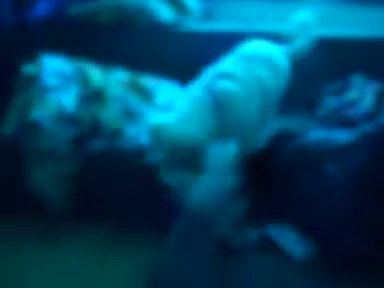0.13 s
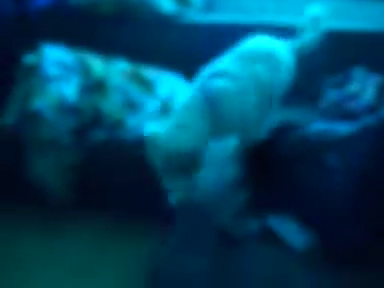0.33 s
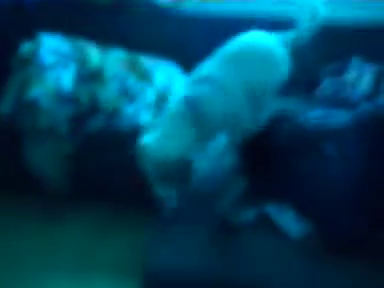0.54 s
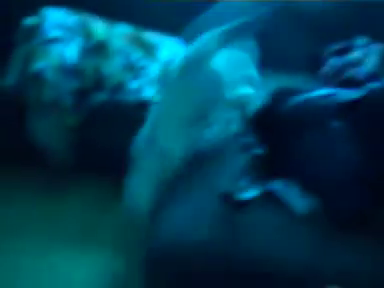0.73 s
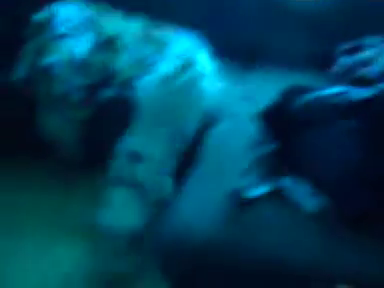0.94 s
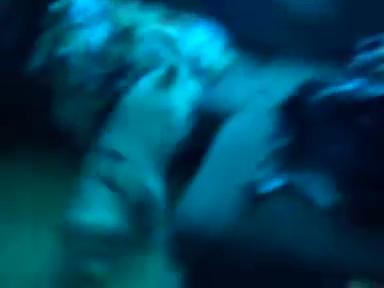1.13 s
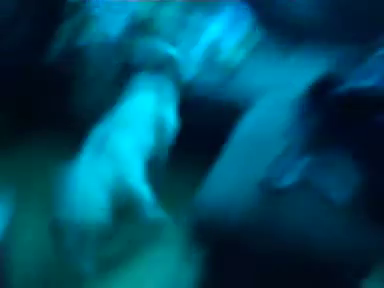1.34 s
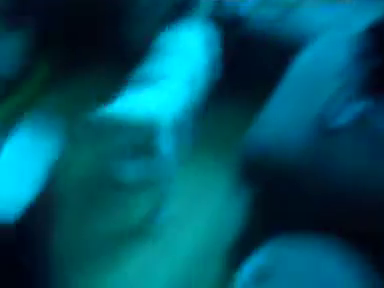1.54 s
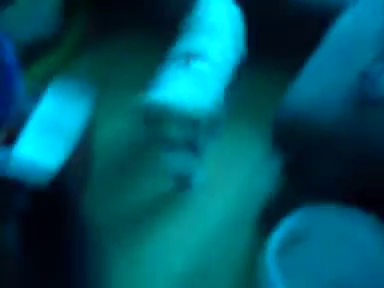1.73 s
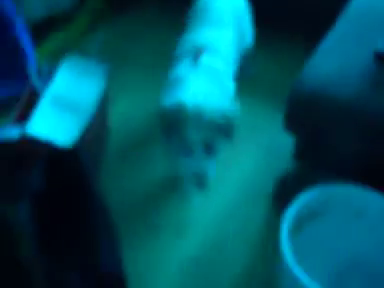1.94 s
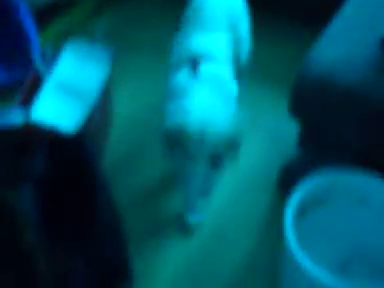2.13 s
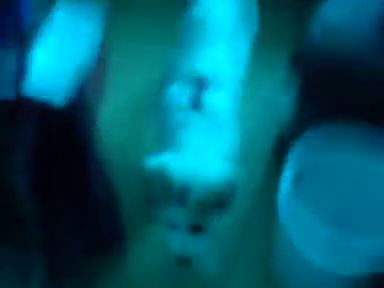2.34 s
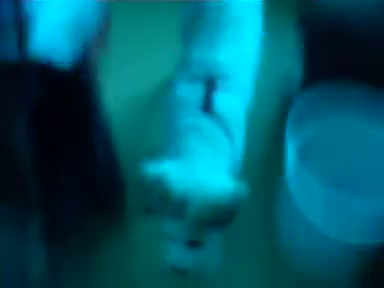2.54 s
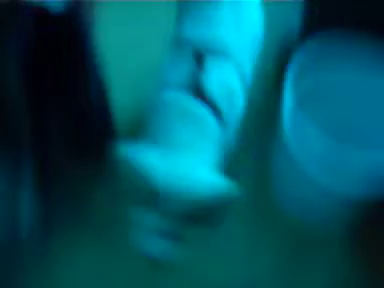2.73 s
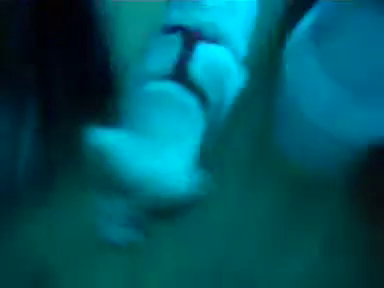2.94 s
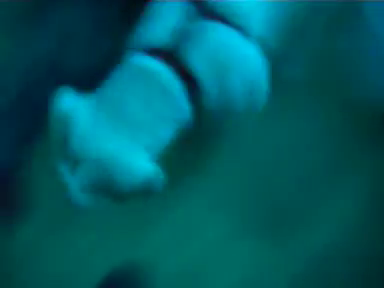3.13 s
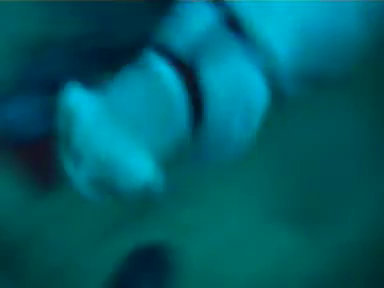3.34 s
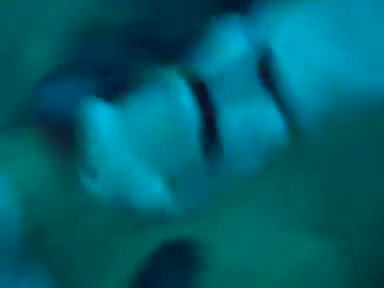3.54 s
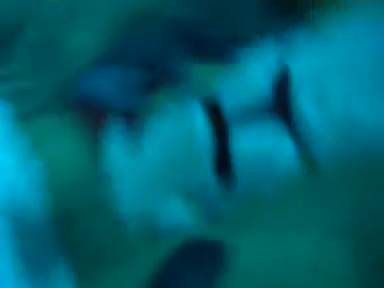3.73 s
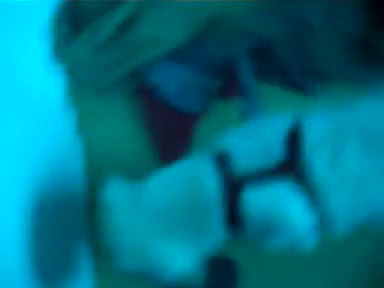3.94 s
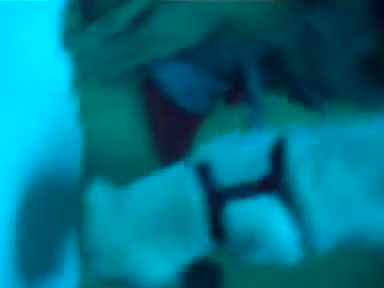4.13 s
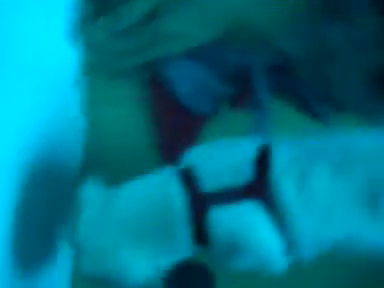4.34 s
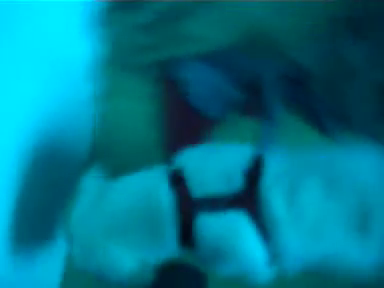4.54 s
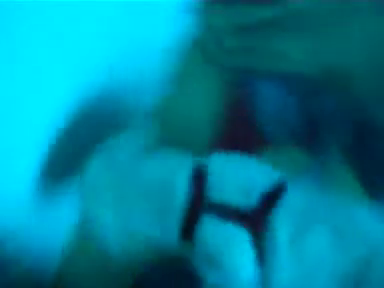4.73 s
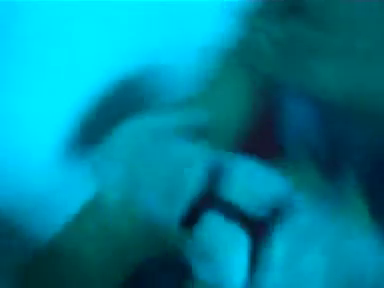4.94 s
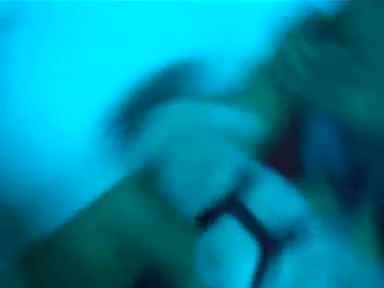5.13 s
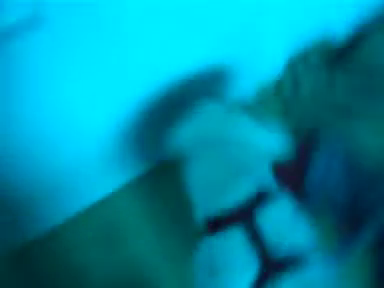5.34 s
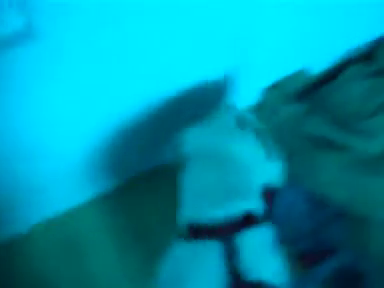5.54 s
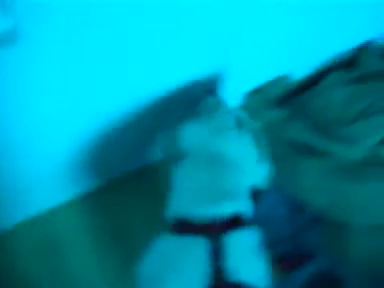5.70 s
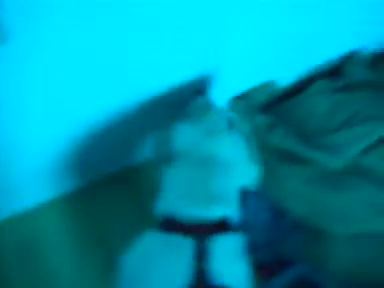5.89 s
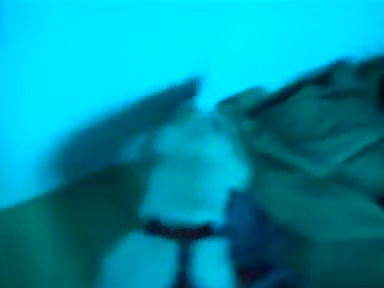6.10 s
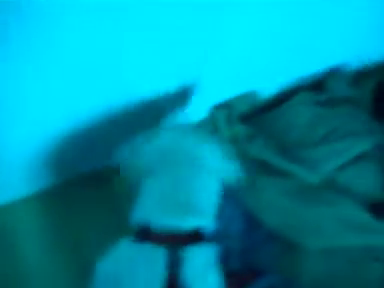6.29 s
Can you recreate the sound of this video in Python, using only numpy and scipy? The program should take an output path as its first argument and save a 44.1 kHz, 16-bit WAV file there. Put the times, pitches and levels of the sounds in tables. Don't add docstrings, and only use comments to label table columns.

```python
import sys
import numpy as np
from scipy import signal
from scipy.fft import rfft, irfft, next_fast_len
from scipy.io import wavfile

SR = 44100
rng = np.random.default_rng(int(sys.argv[2]) if len(sys.argv) > 2 else 0)


def volts_from_db(level):
    exponent = np.asarray(level, float) / 20
    return 10 ** exponent


def persist_wave(psi):
    counts = np.round(np.clip(psi, -1, 1) * 32767).astype(np.int16)
    wavfile.write(sys.argv[1], SR, np.atleast_2d(counts).T)


N = 280476

# time in seconds, effort in dB, nearness to the microphone 0-1.
RUB = [(0, -64.5, 0.37), (.6, -60, 0.3), (0.831, -56.5, 0.74), (.97, -44.5, 0), (1.13, -57, 0),
       (1.24, -49, 0), (1.47, -55.5, 0), (2.02, -69, 0.46), (2.27, -59, 0.1), (2.8, -58.5, 0.57),
       (3.12, -57, 0.84), (3.5, -60.5, 0.9), (3.93, -48, 1), (4.289, -52, 0.68), (4.5, -66.5, 0.8),
       (5.01, -51.5, 0.73), (5.12, -61.5, 0.58), (6.36, -74.5, 0.7)]
# dB at mean effort, share of the effort's swing.
RUB_ZONES = [(-61.5, 0.5), (-58.5, 0.46), (-58.5, 1.0), (-76, 0.27)]
MEAN_EFFORT_DB = -58
NEAR_TOP_DB = 17
ZONES_HZ = [60, 900, 3000, 8000, 17000]
# frequency in Hz, level in dB per Hz.
CLOTH = [(35, -55), (60, -24.5), (148, -18), (207, -14), (445, -1.5), (913, -11), (2350, -11.5), (3520, -9),
         (4320, -9.5), (4940, -4.5), (6330, -1.5), (9070, -9), (11900, -12), (13000, -33.5)]

# frequency in Hz, level in dB per Hz.
ROOM = [(18, -56), (30, -11), (202, -9.5), (443, -17), (632, -3), (1050, -1.5), (1220, 2.5), (1580, -25),
        (4040, -36.5), (4470, -37), (4830, -7), (5210, 0.5), (7070, -42.5), (10300, -32), (13000, -33.5)]
# frequency in Hz, level in dB per Hz.
ROOM_SIDE = [(18, -61), (30, -13.5), (344, -3), (491, 2), (3940, -8), (6070, -15), (9110, -7), (11700, -27),
             (13000, -9.5)]
ROOM_DB, ROOM_SIDE_DB = -64, -62.5
# pitch in Hz, width in Hz, level in dB.
HUM = [(610, 59, -76.5), (1145, 94, -71), (4550, 150, -71)]
# multiple of its pitch, rms level in dB.
WHINE = [(1, -72.5), (3, -83.5), (4, -72), (5, -77.5), (8, -81)]
WHINE_HZ = 1263.7

# start in seconds, length in seconds, pitch in Hz, width in Hz, level in dB.
BREATHS = [
    (0.2, 0.075, 5500, 550, -61),
    (0.33, 0.14, 5200, 400, -58),
    (1.27, 0.17, 5170, 450, -55),
    (1.8, 0.115, 5140, 500, -57),
    (2.39, 0.17, 5170, 500, -58),
    (3.98, 0.24, 5130, 760, -53),
    (1.25, 0.5, 2460, 1200, -60),
]

# start in seconds, length in seconds, peak in dB, weight in dB added to the low zones.
PAW_SLIDES = [
    (.285, 0.086, -51, -1.5),
    (.34, 0.075, -51, 5),
    (.605, 0.058, -56, 6),
    (.685, 0.066, -47, -1.5),
    (.98, 0.063, -43.5, -4.5),
    (3.795, 0.047, -48.5, 5),
    (3.88, 0.1, -50.5, -3),
    (4.26, 0.038, -45, -2.5),
]
SCUFFS = [
    (.42, 0.24, -58.5, 0),
    (.6, 0.038, -47.5, 0),
    (.71, 0.12, -50, 0),
    (.77, 0.1, -54, 0),
    (3.205, 0.033, -60, 0),
    (4.54, 0.094, -55, 0),
]
DRAGS = [
    (.8995, .004, -42, -2),
    (1.241, 0.0054, -31, -10),
    (1.2535, 0.0059, -22, -14),
    (2.212, .012, -49.5, 6),
    (2.663, 0.01, -48, 2),
    (5.243, .006, -46, 0),
]
RUSTLES = [(3.075, 0.072, -45.5, 0.11), (3.15, 0.053, -45, 0), (3.205, 0.039, -46.5, 0),
           (3.32, 0.02, -45, 0), (3.37, 0.025, -58, 0), (3.4, 0.036, -53.5, 0), (3.45, 0.034, -52, 1),
           (3.51, 0.059, -51.5, 0), (3.635, 0.045, -52, 0.024), (3.685, 0.018, -50, 0),
           (3.89, 0.059, -50.5, 0), (3.715, 0.022, -62, 0), (3.755, 0.021, -55, 0)]
SNUFFLES = [
    (4.538, 0.038, -48.5, 13),
    (4.545, 0.062, -38.5, -0.5),
    (4.6, 0.038, -53, 6),
    (4.79, 0.091, -45, -1),
]
SNORTS = [
    (5.222, 0.028, -53, -4.5),
    (5.245, 0.044, -47.5, 1),
    (5.27, .082, -44.5, 2),
    (5.34, .035, -57.5, -1),
]
# share before the peak, start dB, end dB
PAW_COLOUR, PAW_SHAPE = (-14.5, -0.5, -0.5, -15), (0.36, -2.2, -8.5)
SCUFF_COLOUR, SCUFF_SHAPE = (0, 0.5, -21, -29), (0.66, -11.5, -7)
DRAG_COLOUR, DRAG_SHAPE = (-25.5, -8.5, -0.5, -8), (0.98, -7.5, 0)
RUSTLE_COLOUR, RUSTLE_SHAPE = (-13, -9, -3.5, 2.5), (0.56, -2.5, -5.5)
SNUFFLE_COLOUR, SNUFFLE_SHAPE = (-2.5, -10, 0.5, -13), (0.41, -9, -15.5)
SNORT_COLOUR, SNORT_SHAPE = (-6, -4, 1.5, -7), (0.63, -2.6, -11)
STROKE_EDGE_S = 0.0028
# pitch in Hz, level in dB.
WEBBING = [(4100, -2.5), (5500, -2.5), (7000, 5), (8800, -20), (12000, -5)]
THREAD_WIDTH_HZ, THREADS_PER_S, THREADS_DB = 310, 920, 3
# pitch in Hz, width in Hz, level in dB.
SNOUT = [(578, 57, 13), (704, 78, 3.5), (1040, 690, 1.5), (1650, 570, -0.5), (3500, 670, -3.5),
         (4820, 510, -2.5), (5970, 1900, -38)]
NOSE_LOW_HZ, NOSE_GAP_HZ, NOSE_GAP_WIDTH_HZ, NOSE_GAP_SHARE = 550, 2400, 900, .7

# start in seconds, peak in dB.
BOOMS = [
    (0.454, -64),
    (0.781, -51),
    (0.898, -50),
    (0.999, -57.5),
    (1.129, -52.5),
    (1.248, -58.5),
    (1.558, -58),
    (3.901, -58.5),
]
BOOM_HZ, BOOM_T60_S = 147, 0.24

# start in seconds, peak in dB, middle and top in dB
# relative to that, ring in Hz.
TICKS = [(0.5269, -33, 5, -7, 2090), (0.8876, -38, -21, 8, 6540), (0.9038, -11, -21, 12, 6500),
         (0.909, -19, -11, -32, 6550), (0.928, -11.5, -27, -32, 6300), (1.1306, -20, -5, -14, 5240),
         (1.254, -14, -16, -3, 6170), (1.2599, -5, -31, -6, 6150), (1.643, -22.5, -12, -46, 5040),
         (1.7947, -26.5, -15.5, -10, 7150), (2.0175, -21.5, -13, -10.5, 5700),
         (2.2222, -17.5, -13, -14.5, 7400), (2.408, -35, 0.5, -29, 5900), (2.608, -33, -4, -26, 4450),
         (2.6698, -24.5, -12.5, -30, 4530), (2.958, -30, -8.5, -30, 5900), (3.25, -30, -9, 6.5, 6100),
         (1.226, -36, -12.5, -8.5, 6500), (3.931, -23, -9, 1.5, 4270), (5.2479, -25, -2, -4, 4940)]
SNAPS = [(.9048, -6, -28, 8, 10100), (0.9063, -13, -25, -10, 5900), (0.9095, -19, -29, 3, 6550),
         (0.9123, -13, -28, -20, 5490), (0.916, -17, -19, -20, 6040), (1.129, -18, -4.5, -1, 8800),
         (1.2446, -1, -27.5, -4, 6600), (1.2569, 3, -29, -8, 8800), (.846, -33, -25, -10, 6500),
         (.7045, -30, -22, -20, 5900), (.63, -36, -10, -5, 7800), (1.2675, -12, -25, -15, 6200),
         (1.2762, -12.5, -19, -20, 4380), (3.932, -20, -3.5, 4, 4280), (3.957, -19.5, -11, -20, 3240),
         (4.075, -37, -8, -2, 6800), (4.0743, -21.5, -4, -20, 1050), (4.0775, -30, -17, -20, 3940),
         (3.9005, -39, 1, -15, 1000), (5.041, -31, -19, -20, 4330), (0.585, -33.5, 11, -30, 4000),
         (1.3646, -25.5, -20, -6, 8640), (1.475, -44, 13, -28, 6530), (1.7784, -27, -17, -15, 7040),
         (1.8502, -40.5, 2.5, 11.5, 5270), (2.0027, -30, -1.5, -25, 5400), (2.6268, -30, -22, -30, 6500),
         (2.879, -48, -10, 12, 11600), (2.92, -45, -12, 12, 11400), (3.784, -13, -13, 8.5, 5740),
         (4.0728, -15, -12, 3.5, 4370), (4.1616, -29, 0.5, 11, 5340), (5.0308, -35, -7, 12, 6760),
         (5.109, -36, -20, -32, 5200), (5.1088, -35, -21, -30, 3580), (5.8172, -34.5, -26, -22, 5850),
         (5.879, -38.5, -24, -16, 5030), (6.0683, -33, -7, -26, 4550), (6.192, -42.5, 3, -22, 5200),
         (6.23, -38.5, -25, 12, 4900)]
# start in seconds, peak in dB.
CRACKLES = [(3.0444, -28), (3.052, -25), (3.0661, -24.5), (3.077, -15.5), (3.082, -29), (3.085, -25),
            (3.102, -22), (3.127, -29), (3.147, -29), (3.1704, -15.5), (3.177, -30), (3.1823, -24),
            (3.188, -25), (3.2625, -40), (3.275, -40), (3.3055, -32), (3.3213, -23), (3.333, -28),
            (3.377, -29), (3.4057, -28), (3.4395, -28.5), (3.459, -28), (3.492, -30), (3.513, -25),
            (3.55, -37), (3.558, -33), (3.575, -38), (3.719, -36), (3.641, -28), (3.658, -37), (3.688, -38),
            (3.696, -31), (3.727, -36), (3.7595, -28), (3.8015, -32), (3.846, -27), (3.8633, -33),
            (3.896, -29), (3.911, -27), (3.972, -29), (3.985, -31), (4.003, -32), (4.016, -40),
            (4.028, -26.5), (4.152, -29)]
CRACKLE_MIDDLE_DB, CRACKLE_TOP_DB, CRACKLE_HZ, CRACKLE_SPREAD = -22, 7, 7080, 0.057
TICK_SCATTER_DB, SNAP_SCATTER_DB, CRACKLE_SCATTER_DB = -4.5, -17.5, -16.5
SCATTER_HOLD_S = 0.0081
# pitch in Hz, width in Hz, level in dB.
SCATTER_RINGS = [(6390, 1100, 0.5), (4250, 700, -3)]

# start in seconds, peak in dB, pitch in Hz,
# time to fall 60 dB in seconds.
THUMPS = [(0.581, -40.5, 400, 0.095), (0.715, -50, 289, 0.38), (.74, -49.5, 405, 0.11),
          (0.772, -46, 609, 0.097), (0.809, -43.5, 299, 0.21), (0.8966, -25, 494, 0.045),
          (.905, -27.5, 544, 0.033), (0.913, -34, 640, 0.051), (0.924, -31, 438, 0.073),
          (.955, -46, 420, 0.066), (1.1295, -20, 500, 0.029), (1.142, -34, 410, 0.062),
          (1.152, -37.5, 360, 0.052), (1.158, -38, 676, 0.049), (1.174, -47, 460, 0.13),
          (1.23, -43, 483, 0.14), (1.251, -39.5, 622, 0.19), (1.281, -33.5, 416, 0.043),
          (1.478, -46, 450, 0.046), (1.545, -36, 425, 0.03), (1.655, -52.5, 298, .06),
          (1.664, -55, 450, 0.1), (1.736, -56.5, 454, 0.14), (1.865, -56, 324, 0.076),
          (2.019, -56.5, 524, 0.084), (2.2, -55, 704, 0.16), (3.786, -19, 451, 0.021),
          (3.8993, -20, 525, 0.011), (4.064, -36.5, 720, 0.039), (4.0705, -14.5, 496, 0.014),
          (3.945, -46, 500, .05), (4.005, -46, 480, 0.071), (4.6, -50.5, 300, 0.14)]

# time in seconds, peak in dB.
BUCKLE_TAPS = [
    (.5838, -25.5),
    (3.1712, -33),
    (3.1838, -41),
    (3.1895, -38),
]
# pitch in Hz, level in dB, time to fall 60 dB in seconds.
BUCKLE = [(2066, 2.5, 0.014), (3330, -12.5, 0.03), (4740, -8, 0.008)]

# time in seconds, peak in dB.
GRIP = [(0.5857, -29.5), (1.29, -40), (1.5487, -43.5), (3.0916, -36), (3.1024, -42), (3.128, -35),
        (3.1625, -40), (3.1888, -37), (3.2247, -37), (3.2514, -36.5), (3.3218, -46), (3.4114, -44),
        (3.522, -36.5), (3.637, -44), (3.6541, -47), (3.6886, -42), (3.76, -42), (3.785, -14.5),
        (3.8865, -42), (3.9143, -40.5), (3.934, -34), (4.004, -38.5), (4.03, -43), (4.0722, -27.5),
        (4.1524, -36)]
# pitch in Hz, level in dB, time to fall 60 dB in seconds.
HOUSING = [(545, -1, 0.013), (744, -3, 0.01), (1090, -5, 0.0053), (2070, -0.5, 0.0033)]

# start in seconds, peak in dB, pitch in Hz,
# time to fall 60 dB in seconds.
PINGS = [(.9072, -14, 6500, 0.0074), (.9105, -9, 6700, .005), (.9106, -20, 11000, .005),
         (.9128, -12, 5200, 0.01), (.925, -15, 6500, 0.016), (.9305, -20, 5300, .012),
         (1.2476, -8, 6000, .005), (1.246, -18, 4600, .012), (1.2452, -18, 8800, .006),
         (1.258, -8, 6000, .004), (1.2578, 1.5, 7580, 0.0065), (1.26, -16, 4150, 0.01),
         (1.2603, -8, 6300, .012), (1.2638, -14, 6100, .012), (1.2743, -19, 4400, .02),
         (1.2915, -24, 6300, .015), (2.2218, -32.5, 4100, 0.013), (2.2242, -25, 6500, 0.0093),
         (2.238, -36, 5870, .015), (2.245, -39, 6500, .015), (2.6272, -40, 4900, .008),
         (2.6397, -39, 4700, 0.013), (2.669, -38, 6800, .03), (2.676, -41, 4300, 0.013),
         (2.6935, -35, 6200, 0.013), (3.901, -36, 900, .01), (4.5675, -29, 5300, 0.016),
         (4.61, -38, 2300, .01), (4.0694, -30, 290, .03), (4.0707, -30, 960, 0.017),
         (5.258, -38, 3500, .03), (5.247, -37, 1200, .012), (5.2475, -34, 6200, .012),
         (5.2545, -40, 4950, .025), (5.2555, -34, 6300, .012), (5.328, -32, 4860, .012),
         (5.382, -48, 5800, .006), (5.3885, -44, 5200, .006)]
PING_RISE_S = .0003

# start in seconds, length in seconds, pitch in Hz, rms level in dB.
WHISTLES = [
    (2.575, .37, 4457, -63),
    (2.6, .3, 3343, -67),
    (5.0, .23, 2900, -68),
    (4.9, .33, 2130, -69),
    (5.04, .18, 3320, -70),
    (5.07, .15, 4500, -71),
    (1.32, .3, 2850, -68),
    (1.4, .35, 2200, -70),
    (2.3, .15, 2800, -69),
]

# time in seconds, peak in dB.
CATCH = [
    (3.7825, -41),
    (3.7838, -22),
    (3.7846, -35),
    (3.7859, -3.5),
    (3.7868, -12.5),
]
# pitch in Hz, level in dB, time to fall 60 dB in seconds.
SHELL = [(1290, -22, 0.0092), (2040, -24.5, 0.017), (4550, -16, 0.012), (5350, -2.5, 0.0058),
         (6670, -10, 0.006), (7600, -10, 0.006)]

# pitch in Hz, width in Hz, level in dB.
CAVITY = [(4220, 500, -7), (5160, 130, -16.5), (6500, 900, -23.5)]
# frequency in Hz, level in dB.
PORT_SIDE = [(300, -60.5), (2000, -33), (4000, -15), (6000, -13.5), (8000, -6), (9500, 4.5), (11000, -2),
             (12500, -1)]
# frequency in Hz, half turns.
PORT_TURN = [(4000, 1), (7500, .85), (9000, .55), (12500, .3)]
MIC_LOW_HZ, MIC_TOP_HZ = 297, 12450


def rms_one(x):
    return x / np.sqrt(np.mean(x ** 2) + 1e-20)


def at_hz(points, hz):
    p = np.array(points, float)
    return np.interp(np.log(hz + 1), np.log(p[:, 0] + 1), p[:, 1])


def shaped(x, gain):
    size = next_fast_len(N + 4096)
    return irfft(rfft(x, size) * gain(np.arange(size // 2 + 1) * SR / size), size)[..., :N]


def high_pass(x, hz):
    return signal.sosfilt(signal.butter(4, hz, "high", fs=SR, output="sos"), x)


def resonance(x, hz, width):
    r = np.exp(-np.pi * width / SR)
    feedback = [1, -2 * r * np.cos(2 * np.pi * hz / SR), r * r]
    return signal.lfilter([(1 - r * r) / 2, 0, (r * r - 1) / 2], feedback, x)


def peaks(x, modes, flat_db):
    return volts_from_db(flat_db) * x + sum(volts_from_db(db) * resonance(x, hz, width) for hz, width, db in modes)


def drift(rate):
    r = np.exp(-80 * np.pi * rate / SR)
    slow = signal.lfilter([1], [1, -2 * r, r * r], rng.standard_normal(N // 40 + 2002))[2000:]
    return np.interp(np.arange(N) / 40, np.arange(len(slow)), rms_one(slow))


def fibres(per_s, spread_db, hiss):
    sizes = volts_from_db(spread_db * np.minimum(rng.exponential(1, N), 4)) * rng.standard_normal(N)
    grains = rms_one(sizes * (rng.random(N) < per_s / SR))
    return rms_one(grains + hiss * rng.standard_normal(N))


def cloth_colour(body, middle, scratch, top):
    out, hz = 0, np.linspace(0, SR / 2, 2000)
    for x, low, high in zip((body, middle, scratch, top), ZONES_HZ, ZONES_HZ[1:]):
        def zone(f):
            edges = np.sqrt((1 + (low / (f + 1)) ** 8) * (1 + (f / high) ** 8))
            return volts_from_db(at_hz(CLOTH, np.minimum(f, 11900))) / edges
        if x.any():
            out = out + shaped(x, zone) / np.sqrt(np.mean(zone(hz) ** 2))
    return out


def strokes(rows, colour, shape):
    light, heavy = np.zeros((2, N))
    rise, start_db, end_db = shape
    for s, length, peak_db, weight_db in rows:
        t = np.arange(round(length * SR)) / SR
        bend_db = np.interp(t / length, [0, np.clip(rise, .05, .95), 1], [start_db, 0, end_db])
        swell = volts_from_db(peak_db + bend_db) * np.clip(np.minimum(t, length - t) / STROKE_EDGE_S, 0, 1)
        at = slice(round(s * SR), round(s * SR) + len(t))
        light[at] += swell
        heavy[at] += swell * volts_from_db(weight_db)
    return np.array([heavy, heavy, light, light]) * volts_from_db(np.array(colour))[:, None]


def struck(rows, modes, spread_db):
    rows, out = np.array(rows), np.zeros(N)
    chance = rng.normal(0, spread_db, (len(rows), len(modes)))
    for k, (hz, level_db, t60) in enumerate(modes):
        clicks = np.full(N, 1e-18)
        clicks[(rows[:, 0] * SR).astype(int)] = volts_from_db(rows[:, 1] + level_db + chance[:, k])
        r, w = volts_from_db(-60 / (t60 * SR)), 2 * np.pi * hz / SR
        out += signal.lfilter([0, np.sin(w)], [1, -2 * r * np.cos(w), r * r], clicks)
    return out


def rubbing():
    s, effort, near = np.transpose(RUB)
    t = np.arange(N) / SR
    grain, shared = fibres(per_s=1500, spread_db=4.0, hiss=2.0), drift(60)
    swing = np.interp(t, s, effort) - MEAN_EFFORT_DB
    zones = [grain * volts_from_db(db + share * swing + 0.13 * shared + 1.8 * drift(11.0)) for db, share in RUB_ZONES]
    zones[-1] *= volts_from_db(NEAR_TOP_DB * np.interp(t, s, near))
    return cloth_colour(*zones)


def room_tone():
    noise = shaped(rng.standard_normal(N), lambda f: volts_from_db(at_hz(ROOM, np.minimum(f, 11000))))
    out = volts_from_db(ROOM_DB - 2.5) * rms_one(noise)
    air = rng.standard_normal(N)
    for hz, width, level_db in HUM:
        out += volts_from_db(level_db) * rms_one(resonance(resonance(air, hz, width), hz, width))
    turns = np.cumsum(WHINE_HZ * (1 + 0.00042 * drift(4.4))) / SR
    for multiple, level_db in WHINE:
        out += volts_from_db(level_db + 3.0 + 1.0 * drift(4.5)) * np.sin(2 * np.pi * round(multiple) * turns)
    return out


def panting():
    out, air = np.zeros(N), rng.standard_normal(N) * volts_from_db(1.2 * drift(25))
    for s, length, hz, width, level_db in BREATHS:
        t = np.arange(round(length * SR)) / SR
        at = slice(round(s * SR), round(s * SR) + len(t))
        swell = np.clip(np.minimum(t / .3, (length - t) / 0.089) / length, 0, 1)
        out[at] += volts_from_db(level_db) * swell * rms_one(resonance(resonance(air[at], hz, width), hz, width))
    return out


def threads(envelope):
    grain = envelope * fibres(per_s=THREADS_PER_S, spread_db=3.0, hiss=0.52)
    dealt, out = rng.integers(0, 12, N), 0
    for k, hz in enumerate(np.geomspace(WEBBING[0][0], WEBBING[-1][0], 12)):
        plucks = grain * (dealt == k) + 1e-18
        out = out + volts_from_db(at_hz(WEBBING, hz)) * resonance(plucks, hz, THREAD_WIDTH_HZ)
    return 15.0 * out


def slides(grain):
    rustle = strokes(RUSTLES, RUSTLE_COLOUR, RUSTLE_SHAPE)
    zones = strokes(PAW_SLIDES, PAW_COLOUR, PAW_SHAPE)
    zones += strokes(DRAGS, DRAG_COLOUR, DRAG_SHAPE)
    zones += strokes(SCUFFS, SCUFF_COLOUR, SCUFF_SHAPE)
    zones += rustle * volts_from_db(np.array([[0], [0], [-5], [0]]))
    return cloth_colour(*grain * zones) + volts_from_db(THREADS_DB) * high_pass(threads(rustle[2]), 3500)


def booms():
    out, t = np.zeros(N), np.arange(SR // 2) / SR
    rumble = rms_one(resonance(rng.standard_normal(N), 112, 70))
    for s, peak_db in BOOMS:
        at = slice(round(s * SR), round(s * SR) + len(t))
        fade = volts_from_db(peak_db - 60 * t / BOOM_T60_S) * (1 - np.exp(-t / 0.012))
        out[at] += fade * (np.sin(2 * np.pi * BOOM_HZ * t) + 0.73 * rumble[at])
    return out


def ticks():
    zones, rings, t = np.zeros((4, N)), np.zeros(N), np.arange(SR // 5) / SR
    grain = rms_one(peaks(fibres(per_s=2500, spread_db=-3.0, hiss=1.4), SCATTER_RINGS, flat_db=0.5))
    crackle = rng.choice([-1, 1], N) * rng.uniform(0.091, 1.2, N)
    onset, crack, ring = 1 - np.exp(-t / .0001), volts_from_db(-60 * t / .007), volts_from_db(-60 * t / .009)
    tails = [volts_from_db(-60 * np.maximum(t - SCATTER_HOLD_S, 0) / t60) for t60 in (.15, .13, .045)]
    contacts = [(*row, TICK_SCATTER_DB) for row in TICKS] + [(*row, SNAP_SCATTER_DB) for row in SNAPS]
    for s, db in CRACKLES:
        hz = CRACKLE_HZ * rng.normal(1, CRACKLE_SPREAD)
        contacts.append((s, db, CRACKLE_MIDDLE_DB, CRACKLE_TOP_DB, hz, CRACKLE_SCATTER_DB))
    for s, peak_db, middle_db, top_db, hz, scatter_db in contacts:
        start = round((s + .0007) * SR)
        at = slice(start, min(N, start + len(t)))
        n = at.stop - at.start
        rings[at] += volts_from_db(peak_db - 8.5) * (onset * ring * np.sin(2 * np.pi * hz * t))[:n]
        for k, rel_db in enumerate((middle_db + 8.0, 0, top_db - 0.5)):
            scatter = volts_from_db(scatter_db - 8.5) * grain[at] * tails[k][:n]
            zones[k + 1, at] += volts_from_db(peak_db - 11.5 + rel_db) * onset[:n] * (crackle[at] * crack[:n] + scatter)
    return cloth_colour(*zones) + rings


def thumps():
    out, t, rumble = np.zeros(N), np.arange(SR // 4) / SR, rng.standard_normal(N)
    for s, peak_db, hz, t60 in THUMPS:
        at = slice(round(s * SR), round(s * SR) + len(t))
        fade = volts_from_db(-60 * t / max(t60, .01)) * (1 - np.exp(-t / .002)) ** 2
        around = 0.9 * rms_one(resonance(rumble[at], hz, 190))
        out[at] += volts_from_db(peak_db + 3.5) * fade * (1.27 * np.sin(2 * np.pi * hz * t) + around)
    return out


def buckle():
    return struck(BUCKLE_TAPS, BUCKLE, spread_db=0.0)


def grip():
    return high_pass(struck(GRIP, HOUSING, spread_db=6.0), 583)


def pings():
    out, t = np.zeros(N), np.arange(SR // 20) / SR
    for s, peak_db, hz, t60 in PINGS:
        at = slice(round(s * SR), round(s * SR) + len(t))
        fade = volts_from_db(peak_db + 2 - 60 * t / max(t60, .003)) * (1 - np.exp(-t / PING_RISE_S)) ** 2
        out[at] += fade * np.sin(2 * np.pi * hz * t)
    return out


def whistling():
    out, air = np.zeros(N), rng.standard_normal(N)
    for s, length, hz, level_db in WHISTLES:
        t = np.arange(round(length * SR)) / SR
        at = slice(round(s * SR), round(s * SR) + len(t))
        swell = np.clip(np.minimum(t, length - t) / .05, 0, 1)
        out[at] += volts_from_db(level_db) * swell * rms_one(resonance(resonance(air[at], hz, 50), hz, 50))
    return out


def claw_catch():
    return struck(CATCH, SHELL, spread_db=2.0)


def sniffing(grain):
    zones = strokes(SNUFFLES, SNUFFLE_COLOUR, SNUFFLE_SHAPE) + strokes(SNORTS, SNORT_COLOUR, SNORT_SHAPE)
    air = cloth_colour(*grain * zones)
    air = air - NOSE_GAP_SHARE * resonance(air, NOSE_GAP_HZ, NOSE_GAP_WIDTH_HZ)
    return high_pass(high_pass(peaks(air, SNOUT, flat_db=-0.5), NOSE_LOW_HZ), NOSE_LOW_HZ)


def scene():
    grain = volts_from_db(0.5 * drift(70)) * fibres(per_s=1800, spread_db=-4.5, hiss=2.2)
    contacts = slides(grain) + ticks() + thumps() + buckle() + pings() + claw_catch() + sniffing(grain)
    close = rubbing() + high_pass(contacts, MIC_LOW_HZ)
    airborne = peaks(close, CAVITY, flat_db=-2.0) + room_tone() + panting() + booms()
    taps = grip()

    def port_gain(f):
        return volts_from_db(at_hz(PORT_SIDE, f)) * np.exp(1j * np.pi * at_hz(PORT_TURN, f))
    apart = shaped(airborne, port_gain)
    apart *= 1 + 0.91 * drift(250)
    hiss = shaped(rng.standard_normal(N), lambda f: volts_from_db(at_hz(ROOM_SIDE, f)))
    mid = airborne + whistling() - volts_from_db(-15) * taps
    side = apart + volts_from_db(ROOM_SIDE_DB) * rms_one(hiss) + taps
    return np.array([mid + side, mid - side])


def band_limit(x):
    return signal.sosfilt(signal.butter(12, 13620, fs=SR, output="sos"), x)


def record(dry):
    top_cut = signal.ellip(8, .5, 40, MIC_TOP_HZ, fs=SR, output="sos")
    cut = signal.sosfilt(top_cut, np.clip(dry, -1.05, 1.05))
    return band_limit(np.clip(cut, -1, 1))


dry = scene()
out = record(dry)
persist_wave(out)
```